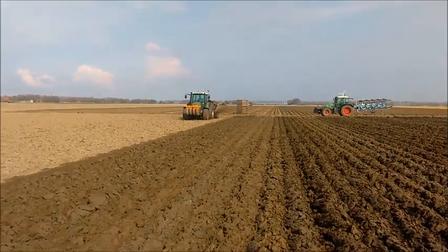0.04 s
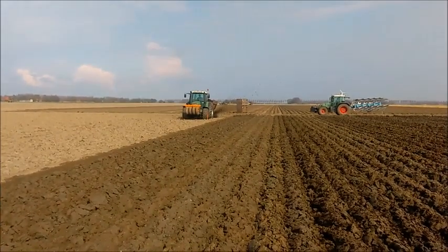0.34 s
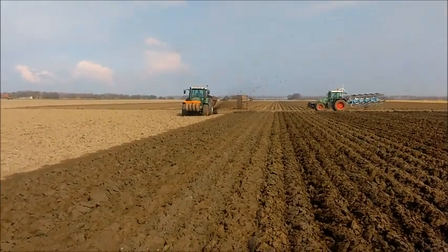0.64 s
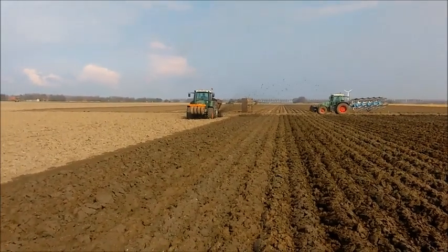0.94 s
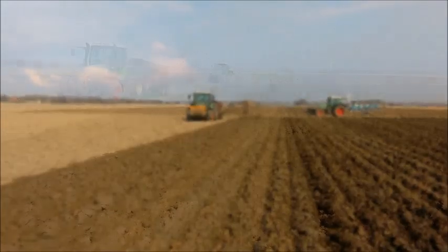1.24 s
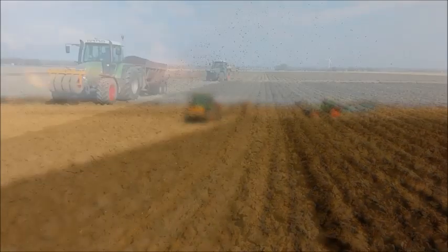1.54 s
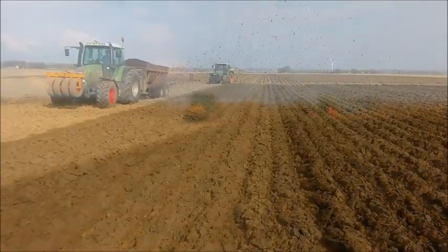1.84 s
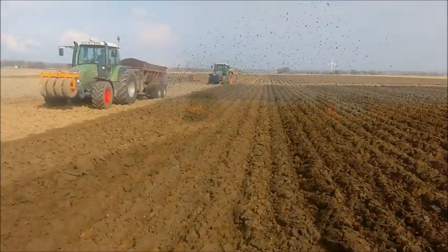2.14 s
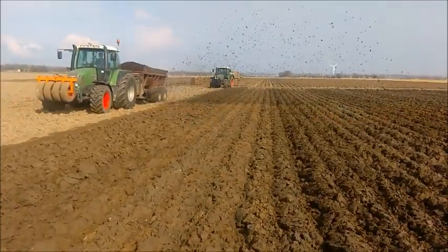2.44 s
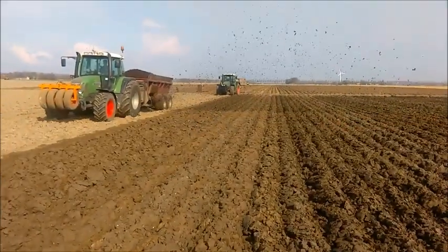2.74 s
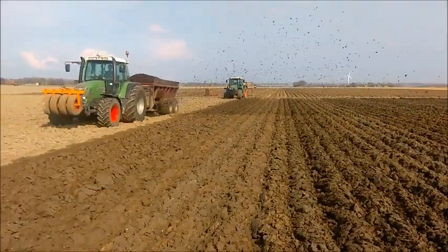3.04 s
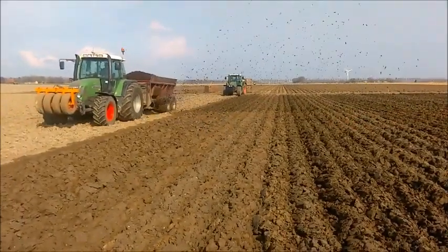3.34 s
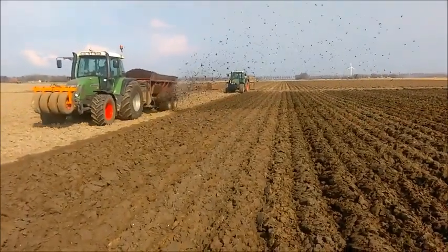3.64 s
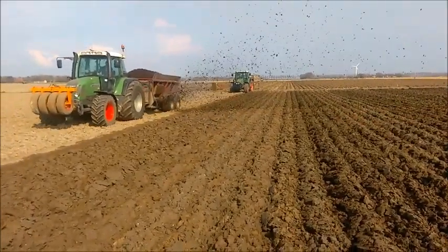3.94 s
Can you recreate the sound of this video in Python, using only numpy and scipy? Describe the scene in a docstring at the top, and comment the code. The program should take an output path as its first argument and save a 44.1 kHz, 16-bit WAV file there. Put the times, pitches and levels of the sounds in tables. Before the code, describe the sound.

A diesel tractor engine runs steadily outdoors, first far away with a hollow ticking chug, then suddenly nearby and hammering. A thin turbocharger whistle sinks and recovers over its drone, and gusts buffet the small stereo microphone.

```python
"""A six-cylinder diesel tractor works a field far off: one hard knock ticks in each engine cycle over a
hollow chug, and a faint, thin hiss passes. At 1.14 s the scene changes to a tractor close by, hauling
a manure spreader, with two hard knocks a cycle and a whistling turbocharger that sinks and recovers.
Exhaust and a geared shaft drone under both. Wind rumbles throughout, and in the close scene thumps,
on a small stereo microphone whose two channels carry the engine's bass in opposite polarity."""
import sys
import numpy as np
from scipy import signal
from scipy.fft import rfft, irfft
from scipy.io import wavfile

SR = 44100
rng = np.random.default_rng(int(sys.argv[2]) if len(sys.argv) > 2 else 0)


def bounce(signal):
    """Save signal as a 16-bit WAV file at the path given by the first command-line argument."""
    frames = np.transpose(np.atleast_2d(signal))
    limited = np.clip(frames, -1, 1)
    pcm = np.round(limited * 32767).astype(np.int16)
    wavfile.write(sys.argv[1], SR, pcm)


N = 176400
T = np.arange(N) / SR
HZ = np.maximum(np.arange(N // 2 + 1) * SR / N, 1)
SCENE_CHANGE_S = 1.143
FAR_FIRING_S, NEAR_FIRING_S = 0.0665, 1.0725  # one firing of each engine's lead cylinder

# engine speed (time [s], speed [rpm])
FAR_RPM = [(0, 1420.5), (1.14, 1420.5)]
NEAR_RPM = [(1.14, 1416), (1.9, 1419), (2.2, 1440), (3.2, 1444), (3.45, 1415), (4, 1412)]


def near_tractor():
    """Close by, two cylinders half a cycle apart hammer and the other four fill in."""
    # knock strength in firing order (level [dB])
    cylinders_db = [2, -7, -4.5, 2, -4.5, -9]
    # extra punch (time [s], lead cylinder [dB], opposite cylinder [dB])
    accents = [(1.15, .5, 0.5), (1.42, 0.5, 1.5), (1.6, 0, 0), (1.85, .5, 2), (2.0, 1, -1.5),
               (2.15, -1.5, -4), (2.3, -.5, -3), (2.42, -2, -0.5), (2.65, -1.5, -1), (2.87, .5, 1),
               (3.15, .5, -0.5), (3.33, 2.5, -3.5), (3.5, 1.5, -1), (3.68, -.5, 0), (4, -1.5, 1)]
    # ringing panels and castings (frequency [Hz], width [Hz], lift [dB])
    modes = [(1102, 46, 5), (1430, 28, 0.5), (1835, 42, 2.5), (1985, 34, 4), (2466, 48, 2.5),
             (2694, 120, 1), (4050, 110, 2.5), (4330, 113, 4.5), (4560, 96, -1), (6960, 94, 3),
             (7680, 105, 6), (8900, 140, 5), (9700, 180, 2.5), (11550, 180, 2)]
    # engine colour in each channel (frequency [Hz], gain [dB])
    left_eq = [(220, -2.5), (260, -1.5), (430, -10), (540, 1), (700, -2), (790, -0.5), (890, 2.5),
               (1010, -5.5), (1470, 0.5), (2100, -7), (2290, 0.5), (2500, -7), (2690, -2), (3450, 0.5),
               (3700, -7), (4040, -5), (4910, -13), (5660, -16), (7660, -20), (10540, -23), (12590, -24),
               (13270, -26), (14510, -29), (15300, -26)]
    right_eq = [(220, -0.5), (390, 2.5), (540, -8), (690, -1), (880, 3), (1110, -1.4), (1300, -1.5),
                (1580, -8), (1850, -1), (2370, -6.5), (2690, 1), (3210, -19), (3570, -15.5), (3900, -4),
                (4260, -10), (4740, -10.5), (5270, -10.5), (5660, -15), (6410, -18.5), (7790, -17.5),
                (10170, -20), (11520, -17.5), (13510, -22), (15300, -30.0)]
    # lead of the left channel over the inverted right (frequency [Hz], phase [rad])
    phase_lead = [(200, 0.092), (350, 0.35), (470, 2), (580, 0.33), (900, 0.8), (1300, 2.2), (1750, 1.66),
                  (2450, 3.5), (3400, 5.7), (3900, 8.5), (5000, 10.9), (16000, 40.5)]
    # engine fader (time [s], level [dB])
    fader = [(1.14, -38.5), (1.5, -37.5), (1.85, -37), (2.2, -37.5), (2.75, -38.5), (2.92, -36.5),
             (3.15, -37.5), (3.5, -36), (3.85, -34.5), (4, -35)]
    hammer = knocks(NEAR_RPM, NEAR_FIRING_S, cylinders_db, accents, attack_s=0.005, hold_s=0.0063,
                    decay_s=0.0072, scatter_db=0.5, jitter_s=0.0004, alike=0.72, grit_db=1)
    hammer = tilt(hammer, low_db=-2.5, mid_db=0, high_db=-0.5)
    bed = tilt(roar(flutter_db=0.7), low_db=0.5, mid_db=-10.5, high_db=-6)
    engine = panel_ring(hammer + bed, modes)
    return mic_ports(engine, left_eq, right_eq, phase_lead, low_cut_hz=100) * undb(curve(fader, T))


def far_tractor():
    """From afar, one cylinder's knock stands out as a tick over a hollow chug."""
    # knock and boom strength in firing order (level [dB])
    cylinders_db = [0, -8, -12, -9.5, -18, -22]
    booms_db = [-1, -15, -14, -6, -15, -16]
    # extra punch (time [s], lead cylinder [dB], opposite cylinder [dB])
    accents = [(0, -1.5, -0.5), (1.14, .5, 1.5)]
    # ringing panels and castings (frequency [Hz], width [Hz], lift [dB])
    modes = [(468, 28, 2.1), (910, 36, 4.3), (1053, 29, 4), (2300, 39, 7.8), (2710, 36, 5.2),
             (3200, 48, 5.3), (3345, 44, 4.1), (3490, 45, 4.8)]
    # engine colour in each channel (frequency [Hz], gain [dB])
    left_eq = [(220, -4.5), (300, -7.5), (370, -8.5), (560, -0.9), (980, -7.5), (1150, -2.5), (1470, -5.5),
               (2690, -7.5), (2990, -9.5), (3450, -3), (4190, -14), (5470, -23.5), (6760, -23), (9640, -31),
               (11930, -31), (13040, -41), (14250, -45), (15300, -43.5)]
    right_eq = [(220, -2), (400, 0.5), (520, -10.5), (650, -2), (890, -0.5), (1150, -14), (1390, -4.5),
                (1760, -16), (2020, -2.5), (2460, -12), (2640, -4.5), (3270, -8.5), (3570, -20),
                (4740, -17.5), (5270, -16.5), (11930, -33), (13040, -27), (15300, -43.2)]
    # lead of the left channel over the inverted right (frequency [Hz], phase [rad])
    phase_lead = [(200, .1), (330, 0.37), (450, 1.84), (560, 0.12), (750, 0.17), (1030, 1.9), (1300, 0.64),
                  (1650, 1.9), (1900, 0.34), (2600, 1.6), (3400, 4.3), (3900, 10.5), (5200, 12.9),
                  (16000, 36.7)]
    # engine fader (time [s], level [dB])
    fader = [(0, -47), (.4, -47.5), (.75, -46.5), (1.14, -47.5)]
    ticks = knocks(FAR_RPM, FAR_FIRING_S, cylinders_db, accents, attack_s=0.0023, hold_s=0.0088,
                   decay_s=0.0067, scatter_db=0.4, jitter_s=0.0002, alike=0.55, grit_db=2)
    ticks = tilt(ticks, low_db=-3, mid_db=2, high_db=-2)
    bed = tilt(roar(flutter_db=1.5), low_db=-1, mid_db=-7.5, high_db=-0.5)
    chug = undb(-16.5) * casing_boom(FAR_RPM, FAR_FIRING_S, booms_db)
    engine = panel_ring(ticks + bed + chug, modes)
    return mic_ports(engine, left_eq, right_eq, phase_lead, low_cut_hz=240) * undb(curve(fader, T))


def knocks(rpm, firing_s, cylinders_db, accents, attack_s, hold_s, decay_s,
           scatter_db, jitter_s, alike, grit_db):
    """Each firing sets off a dense rattle, partly the same whenever that cylinder fires; three strands."""
    count = len(cylinders_db)
    clock = np.arange(-SR // 2, N) / SR  # half a second of pre-roll
    firings = np.cumsum(curve(rpm, clock)) * count / 120 / SR
    starts = np.interp(np.arange(300), firings - np.interp(firing_s, clock, firings), clock)
    age = np.arange(SR // 16) / SR
    envelope = np.minimum(age / attack_s, 1) * np.exp(-np.maximum(age - attack_s - hold_s, 0) / decay_s)
    signatures = rng.standard_normal((count, 3, len(age)))
    track = np.zeros((3, len(clock) + len(age)))
    for k, start in enumerate(starts):
        cylinder = k % count
        force, lag = rng.standard_normal(2)
        fresh = rng.standard_normal((3, len(age)))
        rattle = np.sqrt(alike) * signatures[cylinder] + np.sqrt(1 - alike) * fresh
        accent_db = {0: curve(accents, start), count // 2: curve(accents, start, column=2)}
        gain = undb(cylinders_db[cylinder] + accent_db.get(cylinder, 0) + scatter_db * force)
        at = int((start + jitter_s * lag - clock[0]) * SR)
        if 0 <= at < len(clock):
            track[:, at:at + len(age)] += recolour(rattle) * envelope * gain
    return unit(track[:, len(clock) - N:len(clock)] * undb(grit_db * wander(950)))


def recolour(rattle, ripple_db=2.5, bands=60):
    """Every knock excites the engine's resonances a little differently."""
    spectrum = rfft(rattle)
    bins = np.linspace(0, 1, spectrum.shape[1])
    ripple = np.interp(bins, np.linspace(0, 1, bands), rng.standard_normal(bands))
    return irfft(spectrum * undb(ripple_db * ripple), rattle.shape[1])


def panel_ring(strands, modes):
    """Panels and castings ring on at their own pitches after each impact."""
    response = 1 + sum((undb(db) - 1) * resonance(hz, width) for hz, width, db in modes)
    return irfft(rfft(strands) * response, N)


def casing_boom(rpm, firing_s, cylinders_db):
    """Every firing thumps the casing, which swells and rings low, alike in each cycle."""
    # casing resonances (frequency [Hz], width [Hz], gain [dB])
    modes = [(383, 60, -1), (453.4, 59, 0), (543, 52, -4)]
    count = len(cylinders_db)
    firing = np.floor(engine_cycles(rpm, firing_s) * count).astype(int)
    pulses = np.diff(firing, prepend=firing[0]) * undb(cylinders_db)[firing % count]
    response = sum(undb(db) * resonance(hz, width) ** 2 for hz, width, db in modes)  # squared: soft onset
    return unit(irfft(rfft(pulses) * response, N))


def roar(flutter_db):
    """A noise bed of fan, gears and spreader between the knocks; three strands."""
    return rng.standard_normal((3, N)) * undb(flutter_db * wander(25))


def drone(is_near, waver_db=1.5, shaft_turns_per_cycle=4.693):
    """Exhaust and a geared shaft hum in step with the engine, in opposite polarity left and right."""
    # exhaust partials (multiple of the cycle rate, far level [dB], near level [dB])
    partials = [(3, -67, -67), (4, -65, -65), (5, -70, -67), (6, -64, -55), (8, -62, -53), (11, -65, -52),
                (12, -64, -53.5), (13, -69, -55), (15, -71, -66), (18, -63, -61), (19, -66, -55),
                (20, -70, -56), (21, -63, -56), (22, -71, -59), (27, -68, -62)]
    # shaft hum (time [s], first harmonic [dB], second harmonic [dB], third harmonic [dB])
    hum = [(0, -56, -58, -56), (.7, -53, -58, -56), (1.135, -57, -57, -59), (1.15, -48, -47, -59),
           (1.48, -53, -51, -59), (1.68, -55, -44, -60), (1.9, -51, -49, -48), (2.2, -46, -52, -45),
           (2.55, -48, -46, -64), (2.95, -49, -48, -45), (3.3, -46, -48, -45), (3.65, -51, -45, -64),
           (4, -47, -43, -47)]
    cycles = np.where(is_near, engine_cycles(NEAR_RPM, NEAR_FIRING_S),
                      engine_cycles(FAR_RPM, FAR_FIRING_S))

    def tone(multiple, db):
        return np.sqrt(2) * undb(db) * np.sin(2 * np.pi * (multiple * cycles + rng.random()))

    exhaust = sum(tone(multiple, np.where(is_near, near_db, far_db) + waver_db * wander(3))
                  for multiple, far_db, near_db in partials)
    shaft = sum(tone(k * shaft_turns_per_cycle, curve(hum, T, column=k)) for k in (1, 2, 3))
    return (exhaust + shaft) * pan(right_db=1) * np.array([[1], [-1]])


def turbo(wobble_hz=60, width_hz=90):
    """A rough, wobbling whistle from the compressor blades; it sinks and fades as the load eases."""
    # whistle pitch (time [s], frequency [Hz])
    pitch = [(0, 12640), (.2, 12600), (.5, 12930), (.8, 12960), (1.135, 13100), (1.15, 13400),
             (1.45, 13570), (1.9, 13470), (2.38, 13310), (2.6, 12980), (2.9, 12900), (3.3, 13070),
             (3.62, 13340), (4, 13410)]
    # whistle fader (time [s], level [dB])
    fader = [(0, -78), (.7, -78), (1.135, -72), (1.15, -63), (1.5, -63), (2.3, -61.5), (2.5, -72),
             (2.65, -69), (2.9, -71), (3.3, -69), (3.65, -60), (4, -59.5)]
    blade_hz = curve(pitch, T) + wobble_hz * wander(35)
    blades = np.exp(2j * np.pi * np.cumsum(blade_hz) / SR)
    roughness = [wander(width_hz) + 1j * wander(width_hz) for _ in range(2)]
    whistle = np.array([unit((blades * side).real) for side in roughness])
    return whistle * undb(curve(fader, T)) * pan(right_db=2)


def buffets(half_length_s=0.011, left_db=-21.5):
    """Single eddies thump on the microphone, much harder on the right."""
    # thumps (time [s], level at the crest [dB])
    hits = [(1.153, -43.5), (1.265, -43), (1.346, -42), (1.753, -37), (1.837, -38), (2.402, -43),
            (2.477, -33.5), (2.514, -36), (2.589, -39), (2.71, -39), (2.771, -41.5), (2.933, -41.5),
            (3.006, -39.5), (3.141, -38), (3.228, -36.5), (3.688, -41), (3.832, -35), (3.91, -34),
            (3.995, -39)]
    # thump colour (frequency [Hz], gain [dB])
    eq = [(20, -22), (50, -8.5), (100, 3), (170, -4), (270, -7.5), (450, -16), (1000, -45)]
    air = equalise(rng.standard_normal(N), eq)
    thumps = np.zeros(N)
    for at, db in hits:
        swell = np.exp(-((T - at) / half_length_s) ** 2)
        thumps += undb(db) * unit(air * swell) * np.sqrt(np.mean(swell ** 2))
    return thumps * np.array([[undb(left_db)], [1]])


def wind(flutter_db=2, flutter_hz=45):
    """Gusts rumble at each microphone port on its own."""
    # rumble colour (frequency [Hz], gain [dB])
    eq = [(15, -4), (30, -9.5), (55, -2), (105, -1), (170, -3.5), (260, -6), (450, -26), (1000, -49)]
    # wind fader (time [s], level [dB])
    fader = [(0, -63), (.3, -67.5), (.75, -62), (1.0, -69), (1.12, -68), (1.16, -54), (1.35, -53.5),
             (1.65, -56), (2.0, -56.5), (2.3, -58.5), (2.45, -49), (2.6, -50.5), (3.15, -52), (3.45, -54),
             (3.88, -50), (4, -50)]
    eddies = rng.standard_normal((2, N)) * undb(flutter_db * wander(flutter_hz))
    return unit(equalise(eddies, eq)) * undb(curve(fader, T))


def brief_hiss(at_s=0.755, half_length_s=0.027, level_db=-64):
    """A faint, thin, high hiss swells and fades briefly."""
    # hiss colour (frequency [Hz], gain [dB])
    eq = [(3000, -25), (7000, 0), (12000, 1), (15000, -6)]
    hiss = unit(equalise(rng.standard_normal((2, N)), eq))
    return hiss * undb(level_db) * np.exp(-((T - at_s) / half_length_s) ** 2)


def mic_ports(strands, left_eq, right_eq, phase_lead, low_cut_hz):
    """One strand reaches both ports, the left first; the other two are scattered sound, one a port."""
    # likeness of the channels (frequency [Hz], coherence [0-1])
    likeness = [(300, 0.96), (650, 0.98), (900, 0.97), (1500, 0.73), (4300, 0.84), (8000, 0.23),
                (15000, 0.25)]
    direct, *scattered = rfft(strands)
    coherence = over_frequency(likeness)
    half_lead = np.exp(0.5j * curve(phase_lead, HZ))
    direct_pair = direct * np.array([half_lead, -half_lead.conj()])  # right channel inverted
    pair = np.sqrt(coherence) * direct_pair + np.sqrt(1 - coherence) * np.array(scattered)
    colour = undb([over_frequency(left_eq), over_frequency(right_eq)])
    low_cut = 1 / np.hypot(1, (low_cut_hz / HZ) ** 2)
    return unit(irfft(pair * colour * low_cut, N))


def engine_cycles(rpm, firing_s):
    """Engine cycles, two crank turns each, counted from a firing of the lead cylinder."""
    cycles = np.cumsum(curve(rpm, T)) / 120 / SR
    return cycles - np.interp(firing_s, T, cycles)


def resonance(hz, width_hz):
    """Band-pass response of one ringing mode."""
    return 1 / (1 + 1j * hz / width_hz * (HZ / hz - hz / HZ))


def tilt(sound, low_db, mid_db, high_db):
    """Three-band EQ: bass, mids and treble."""
    return equalise(sound, [(700, low_db), (3000, mid_db), (10000, high_db)])


def equalise(sound, eq):
    """Shape a sound with an EQ curve of (frequency [Hz], gain [dB])."""
    return irfft(rfft(sound) * undb(over_frequency(eq)), N)


def pan(right_db):
    """Stereo gains that put the right channel this far above the left."""
    return undb([[-right_db / 2], [right_db / 2]])


def wander(rate_hz):
    """Smooth random modulation at rms 1."""
    return unit(irfft(rfft(rng.standard_normal(N)) * np.exp(-(HZ / rate_hz) ** 2), N))


def curve(table, at, column=1):
    """A column of a table, joined by straight lines."""
    rows = np.array(table, float)
    return np.interp(at, rows[:, 0], rows[:, column])


def over_frequency(table):
    """A table of (frequency [Hz], value), joined on a log-frequency axis."""
    rows = np.array(table, float)
    return np.interp(np.log(HZ), np.log(rows[:, 0]), rows[:, 1])


def undb(db):
    """Decibels to gain."""
    return 10 ** (np.asarray(db) / 20)


def unit(x):
    """Scale to rms 1."""
    return x / np.sqrt(np.mean(np.abs(x) ** 2))


def scene():
    """The far tractor switches to the near one; drone, whistle and wind run through both."""
    is_near = T >= SCENE_CHANGE_S
    tractor = np.where(is_near, near_tractor(), far_tractor())
    return tractor + drone(is_near) + turbo() + wind() + buffets() + brief_hiss()


def record(dry):
    """A steep low-pass takes off the air above 15.4 kHz."""
    return signal.sosfilt(signal.ellip(8, 0.2, 70, 15400, fs=SR, output="sos"), dry)


dry = scene()
out = record(dry)
bounce(out)
```